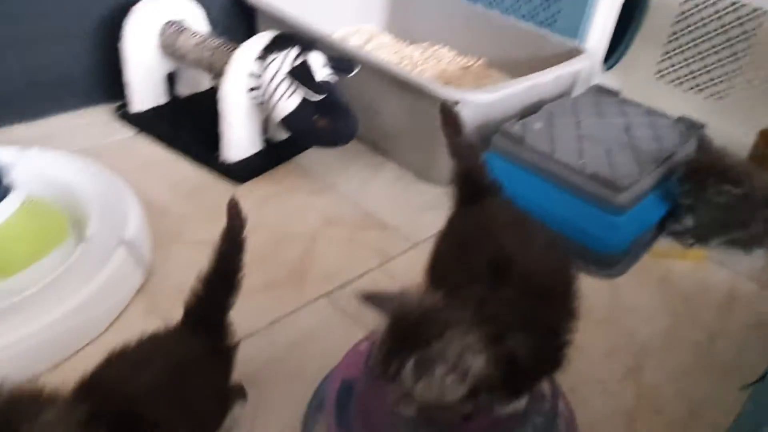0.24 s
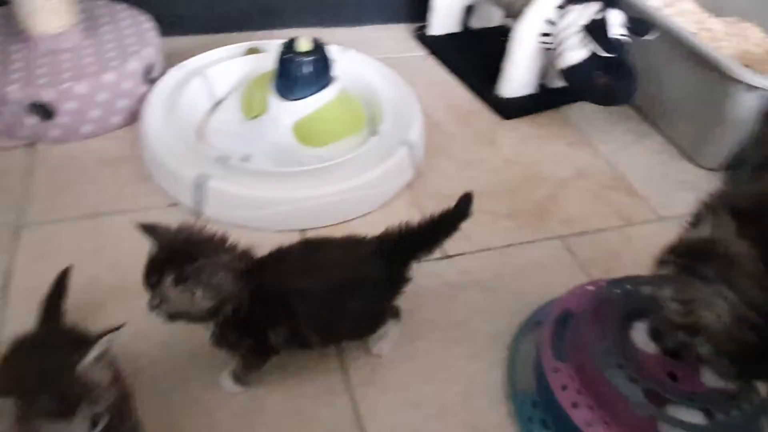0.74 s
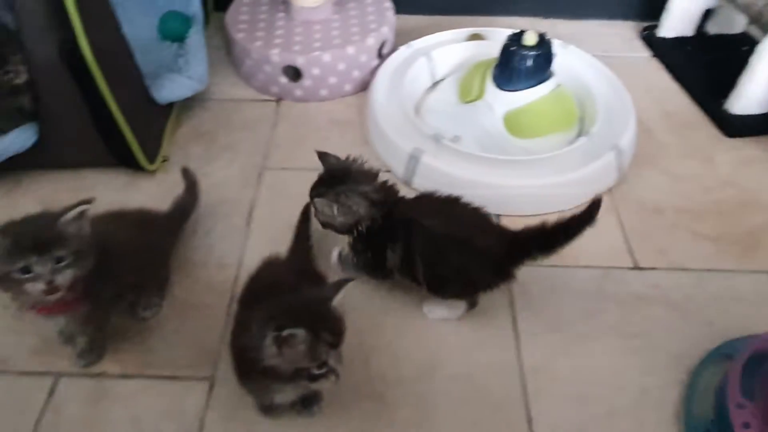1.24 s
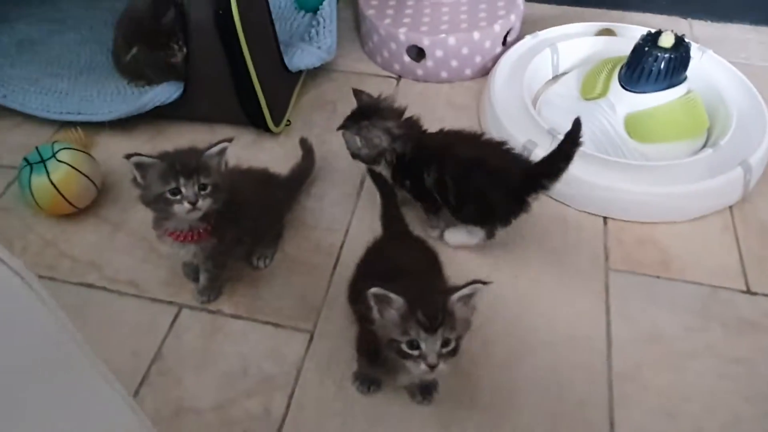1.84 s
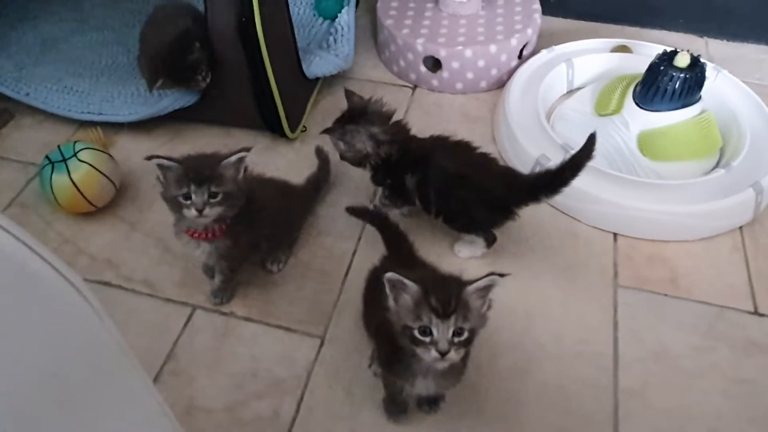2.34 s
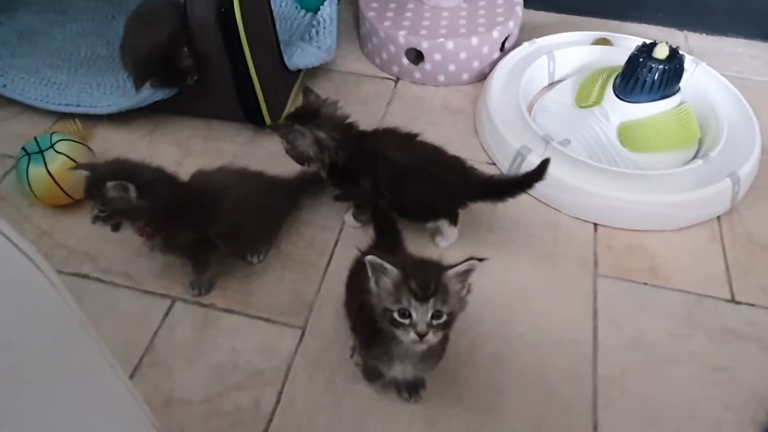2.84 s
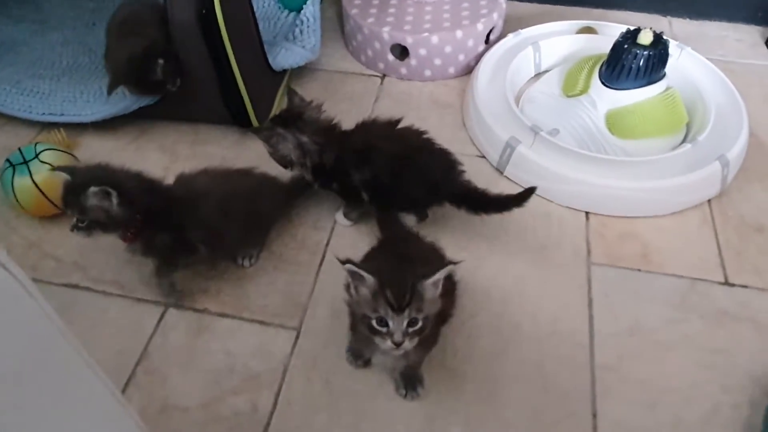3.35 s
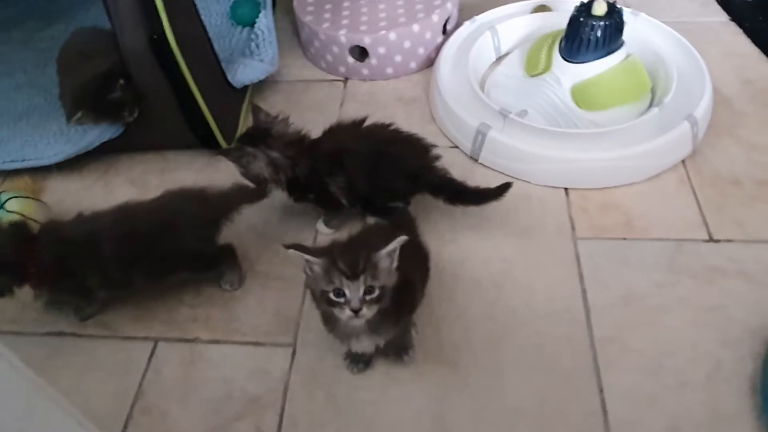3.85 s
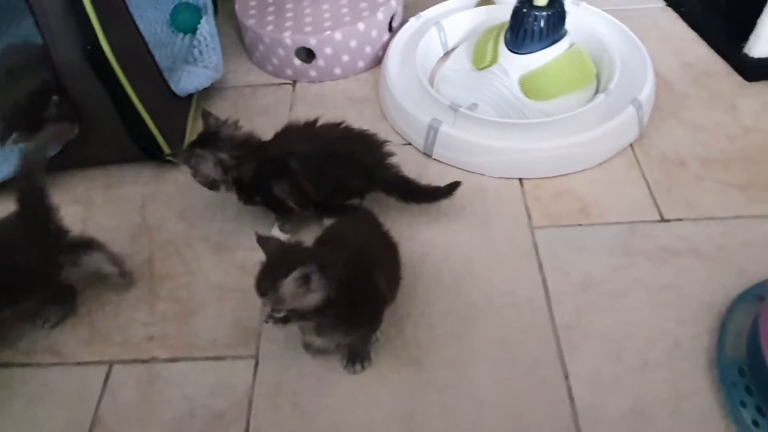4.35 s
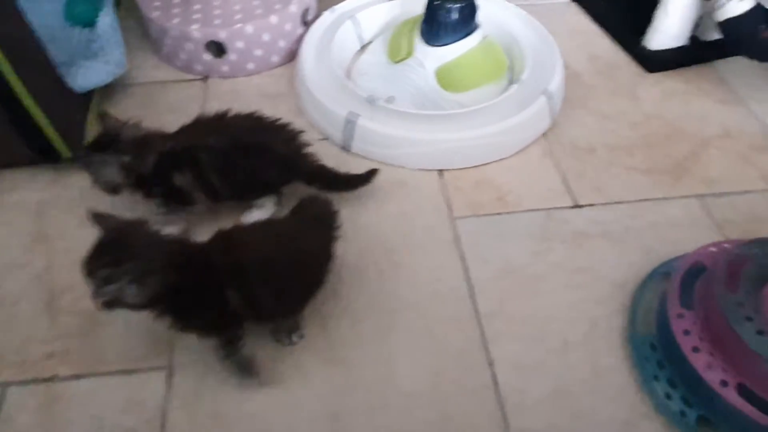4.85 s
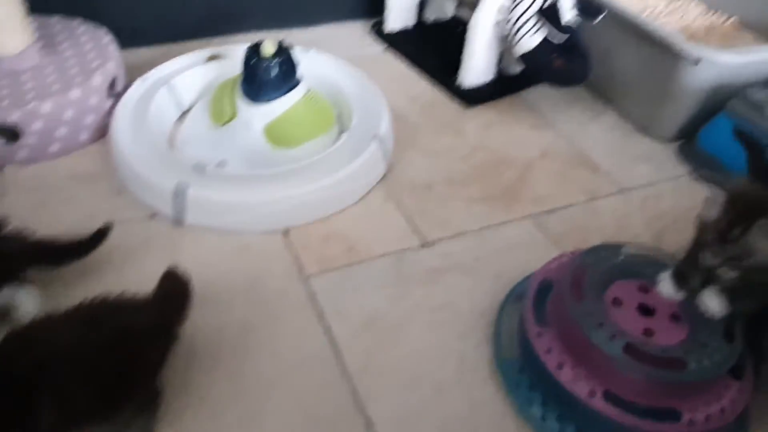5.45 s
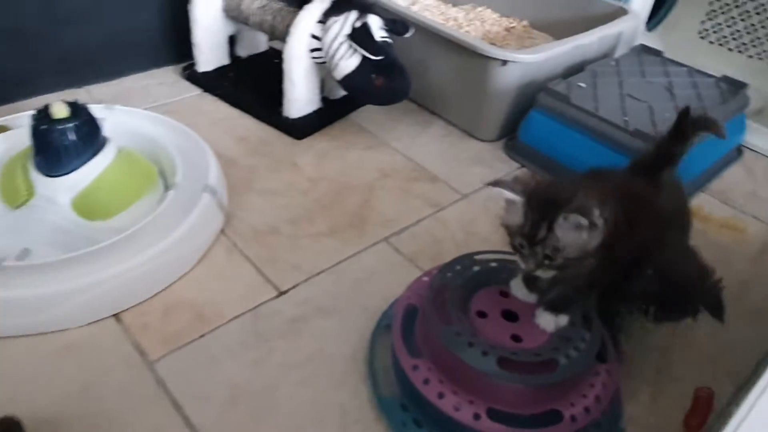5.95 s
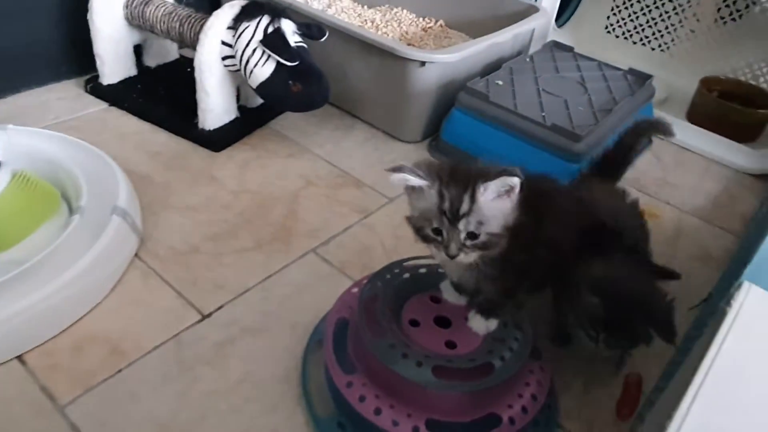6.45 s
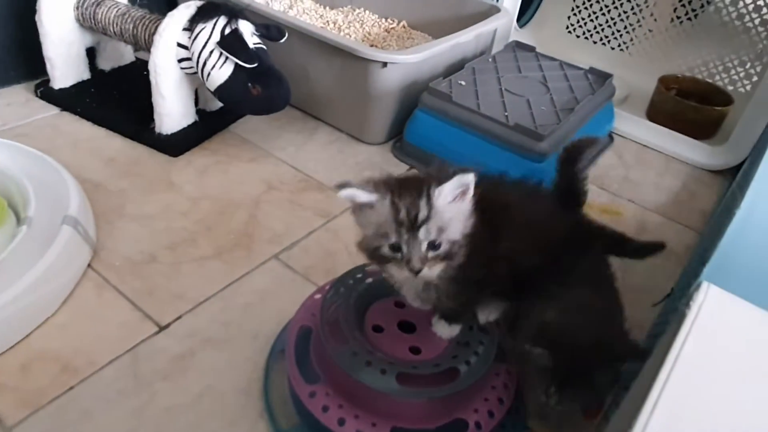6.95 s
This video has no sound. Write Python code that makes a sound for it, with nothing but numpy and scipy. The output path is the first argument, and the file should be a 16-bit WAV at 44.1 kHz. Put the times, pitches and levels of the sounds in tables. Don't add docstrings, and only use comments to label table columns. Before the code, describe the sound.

Kittens mill about on hard tiles near a handheld stereo microphone with low handling rumble and faint hum. A bright thin mew comes first, then near quiet, then a weaker mew running into a dense flurry of hollow plastic knocks, sharp ticks and paw scrabble. The ball hums on as it slows. A far-off mew overlaps a small chirp, and two small groups of knocks end it, with short room reverberation.

```python
import sys
import numpy as np
from scipy import signal
from scipy.fft import rfft, irfft, next_fast_len
from scipy.io import wavfile
from scipy.ndimage import uniform_filter1d, map_coordinates

SR = 44100
rng = np.random.default_rng(int(sys.argv[2]) if len(sys.argv) > 2 else 0)


def amplitude_ratio(level_db):
    exponent = np.asarray(level_db, float) / 20
    return 10 ** exponent


def transcribe(u):
    v = np.clip(np.atleast_2d(u).T, -1, 1)
    q = np.round(v * 32767).astype(np.int16)
    wavfile.write(sys.argv[1], SR, q)


N = 317512

# t/s, pitch/Hz, effort/dB, mouth opening/0-1
FIRST_MEW = [(.812, 1270, -51, .95), (.845, 1241, -36.5, 0.94), (.872, 1245, -34, 0.92),
             (.965, 1267, -36.5, 0.7), (1.03, 1234, -37.5, .55), (1.088, 1232, -36.5, 0.43),
             (1.118, 1195, -44.5, 0.56), (1.2, 1162, -43, 0.46), (1.3, 1126, -47, 0.44)]
FIRST_MEW_CLOSING = [
    (1.41, 1097, -46, .37),
    (1.45, 1170, -57, .25),
    (1.466, 980, -59, .03),
    (1.488, 860, -70, 0),
]
SECOND_MEW = [(2.952, 1179, -54.5, 1), (2.994, 1221, -44, 0.7), (3.04, 1202, -40.5, 0.8),
              (3.079, 1198, -40, 0.75), (3.139, 1163, -47.5, 0.71), (3.2, 1145, -48, 0.7),
              (3.26, 1128, -49, 0.58), (3.315, 1116, -45.5, 0.45), (3.342, 1150, -50, 0.45)]
DISTANT_MEW = [(4.617, 1041, -72, 0.67), (4.64, 990.3, -57, 0.85), (4.725, 1069, -54, 0.94),
               (4.76, 1166, -52.5, 0.77), (4.8, 1190, -53, 0.68), (4.9, 1224, -57, 0.61),
               (4.97, 1289, -61, 0.5), (5.03, 1283, -52.5, 0.44), (5.095, 1150, -70, 0.32)]
CHIRP = [(4.984, 1456, -60, 0.52), (5.001, 1447, -56, 0.52), (5.04, 1431, -52.5, 0.5),
         (5.064, 1400, -53, 0.42), (5.08, 1330, -54, 0.4), (5.095, 1190, -57, .4), (5.12, 1150, -75, 0.3)]
EARLY_CHIRP = [
    (3.345, 1170, -48, .38),
    (3.365, 1225, -43, .38),
    (3.39, 1232, -44, .38),
    (3.42, 1195, -50, .38),
    (3.46, 1150, -62, .38),
]
# f/Hz, level/dB
FIRST_MOUTH = [(2530, -47), (4300, -8), (5080, -7), (5660, -17.5), (6130, -7), (7900, -15), (8610, -17.5),
               (10200, -15.5), (12400, -7), (15600, -23.5)]
SECOND_MOUTH = [(2470, -62), (4200, -26), (4820, -8), (5200, -18), (5680, -4), (6100, -4), (7670, -23.5),
                (8470, -12), (8950, -16.5), (15600, -24)]
DISTANT_MOUTH = [(3900, -3), (4600, 6.5), (5300, -2), (6100, 6.5), (7200, -6), (8000, -16), (9500, -18),
                 (11500, -4), (13000, -8), (15000, -28)]
CHIRP_MOUTH = [(4000, -20), (5700, 0), (7200, -18), (9500, -20), (11500, -8), (13000, -18), (15600, -30)]
# left lag/ms, left-right low/dB, left-right high/dB
SEATS = [
    (0.3367, -0.5, 1.5),
    (-.25, -8.5, 3),
    (-.2, -4.5, -3),
    (-0.272, -0.5, -0.5),
    (-0.26, -5.5, -4),
]
# room/dB, breath/dB, pitch jitter/share, rasp/share
VOICES = [
    (-9, -30.5, .0024, .002),
    (-10, -30, .0024, .0015),
    (-2, -25, .007, .004),
    (-4, -26, .004, .002),
    (-8, -22, .016, .01),
]
# fundamental shut/dB, open/dB, least 2nd partial/dB, upper partials shut/dB, open/dB
BUILDS = [
    (0, -27, -17.5, -6.5, -10.5),
    (-14, -27, -5, -11, -7),
    (-25, -17.5, -5.5, -24, -1.5),
    (-14, -24, -10.5, -10, -8),
    (-35, -36, -1.5, -30, -30),
]
# f/Hz, density/dB per Hz
BREATH = [(500, -30), (1100, -13), (1900, -22), (3000, -13), (4500, -12), (6500, -1), (8000, -12),
          (10000, -5), (12500, 0), (15500, -20)]
HEAD_SHADE_HZ = 3000


def mews(out):
    contours = (FIRST_MEW + FIRST_MEW_CLOSING, SECOND_MEW, DISTANT_MEW, CHIRP, EARLY_CHIRP)
    mouths = (FIRST_MOUTH, SECOND_MOUTH, DISTANT_MOUTH, CHIRP_MOUTH, CHIRP_MOUTH)
    for contour, mouth, seat, manner, build in zip(contours, mouths, SEATS, VOICES, BUILDS):
        lag_ms, pan_db, high_pan_db = seat
        room_db, breath_db, jitter, rasp = manner
        s, *columns = np.transpose(contour)
        t = np.arange(s[0], s[-1], 1 / SR)
        pitch, effort_db, opening = [np.interp(t, s, column) for column in columns]
        unsteady = 1 + jitter * wobble(44.96, size=len(t)) + rasp * wobble(240, size=len(t))
        pitch = uniform_filter1d(pitch, size=300) * unsteady

        k = np.arange(1, 15)[:, None]
        gain = partial_gains(k, t - s[0], pitch, effort_db, opening, mouth, build)
        cycles = np.cumsum(pitch) / SR
        voice = np.sum(gain * np.sin(2 * np.pi * (k * cycles + rng.random(k.shape))), axis=0)
        air = unit(filtered(rng.standard_normal(len(t)), lambda hz: amplitude_ratio(along(BREATH, hz))))
        loudness = uniform_filter1d(np.linalg.norm(gain, axis=0), 2000)
        voice += amplitude_ratio(breath_db) * loudness * air
        voice *= np.clip(np.minimum(t - s[0], (s[-1] - t) / 4) / 0.0009, 0, 1)

        def to_ports(hz):
            shade_db = np.where(hz < HEAD_SHADE_HZ, pan_db, high_pan_db)
            return lagging(hz, lag_ms) * amplitude_ratio(np.outer([.5, -.5], shade_db))

        add(out, filtered(voice, to_ports), s[0], room_db)


SHUT_HZ, OPEN_HZ, MOUTH_WIDTH_HZ = 1000, 4200, 660
ONSET_FIRST_DB, ONSET_S = 16.5, .04
FLICKER_DB, STEADY_DB = 2.5, 10
FOURTH_DB = -8.5


def partial_gains(k, age_s, pitch, effort_db, opening, mouth, build):
    shut_db, open_db, second_db, dull_db, bright_db = build
    size = len(age_s)
    centre_hz = SHUT_HZ + (OPEN_HZ - SHUT_HZ) * opening
    low = 1 / (1 + ((k[:4] * pitch - centre_hz) / MOUTH_WIDTH_HZ) ** 2)
    low = low / np.linalg.norm(low, axis=0)
    first_db = shut_db + (open_db - shut_db) * opening + ONSET_FIRST_DB * np.exp(-age_s / ONSET_S)
    low[:2] = np.hypot(low[:2], amplitude_ratio([first_db, second_db + 0 * age_s]))
    slack = np.clip((effort_db.max() - effort_db) / STEADY_DB, .15, 1)
    flicker = np.array([wobble(38, size=size) for _ in low]) ** 2
    low *= amplitude_ratio(-FLICKER_DB * slack * flicker)

    upper = amplitude_ratio(along(mouth, k[3:] * pitch) + [2.6 * wobble(28, size=size) for _ in k[3:]])
    upper *= amplitude_ratio(dull_db + (bright_db - dull_db) * opening) / np.linalg.norm(upper, axis=0)
    upper[0] = np.hypot(upper[0], amplitude_ratio(FOURTH_DB) * low[3])

    gain = np.sqrt(2) * amplitude_ratio(effort_db) * np.vstack([low[:3], upper]) * (k * pitch < 15600)
    shimmer = np.array([wobble(120, size=size) for _ in k])
    return gain * (1 + (0.11 + 0.012 * k) * shimmer)


# t/s, peak/dB, bright rattle/dB, rise/ms
KNOCKS = [(2.999, -55, -5.5, 2.7), (3.105, -47.5, -13, 6.3), (3.125, -50, -18, 6), (3.15, -44, -18.5, 5.8),
          (3.168, -46, -18, 6), (3.19, -48, -18, 6), (3.213, -48, -18, 6), (3.23, -50, -18, 6),
          (3.248, -45.5, -8, 3.7), (3.268, -42.5, -18, 6.2), (3.284, -27, -10.5, 3.2), (3.339, -41, -11, 5),
          (3.349, -30, -8, 4), (3.359, -34, -14, 4.2), (3.366, -25, -13, 4), (3.409, -38.5, -20, 5.2),
          (3.433, -35.5, -25, 5.5), (3.472, -36, -21, 2), (3.516, -37, -8, 1.14), (3.532, -40, -15, 2),
          (3.576, -25, -14, 0.98), (3.589, -36, -9.5, 2.1), (3.619, -30.5, -14, 1.2),
          (3.633, -44, -14.5, 1.7), (3.648, -40, -16, 2.2), (3.655, -39.5, -12, 2.1),
          (3.671, -36.5, -9.5, 3.8), (3.688, -43.5, -8, 2), (3.756, -44.5, -23, 1.5), (3.862, -47, -15, 3),
          (3.876, -46, -16, 3.3), (3.894, -22.5, -15, 6), (3.914, -32, -7, 4.8), (3.958, -39.5, -14, 4),
          (3.973, -42, -11, 3.1), (4.01, -45, -18, 5.3), (4.139, -43.5, -16.5, 6), (4.29, -58.5, -21, 5.9),
          (5.636, -36, -13.5, 1.66), (5.645, -34.5, -14.5, 3.7), (5.677, -37.5, -11, 1.34),
          (6.319, -37.5, -15.5, 2.9), (6.374, -30.5, -11.5, 2.2), (6.385, -32.5, -17, 1.5),
          (6.413, -31.5, -9, 1.2), (6.421, -37, -25, 2.1)]
# t/s, hollow ring/dB, floor thud over it/dB
PAWS = [(1.244, -61.5, -8), (1.567, -64.5, 14.5), (1.653, -74.5, 19.5), (2.703, -68.5, 11.5),
        (4.479, -58, -20), (4.492, -56, -20), (5.481, -58, -5), (5.794, -54, -12), (5.88, -57, -12),
        (6.542, -60, -17), (6.705, -63.5, -7.5)]
# f/Hz, level/dB, t60/s
HOLLOW = [(505, -4, .045), (562, 1, .06), (615, -4, .04), (700, -14, .035), (790, -17, .035),
          (900, -22, .025)]
KNOCK_THUD_DB = -20.5
PAW_BRIGHT_DB, PAW_RISE_MS = -17, 3.2
SCATTER_DB, DETUNE_SHARE = 2.5, .02
CRACK_T60_S, RATTLE_T60_S, RATTLE_GRAIN_DB, THUD_T60_S = 0.0068, 0.21, 3.5, 0.023
OUTER_RING_S, OUTER_RING_HZ, OUTER_RING_DB = 3.5, 650, 5
CAMERA_SWING_S, LAG_BEFORE_MS, LAG_AFTER_MS = 5, .14, -.12
TRACK_ROOM_DB = -10


def knocks(out):
    t = np.arange(SR // 8) / SR
    blows = [(*row, KNOCK_THUD_DB) for row in KNOCKS]
    blows += [(s, db, PAW_BRIGHT_DB, PAW_RISE_MS, thud_db) for s, db, thud_db in PAWS]
    for s, db, bright_db, rise_ms, thud_db in blows:
        ring = np.zeros(len(t))
        for hz, level_db, t60_s in HOLLOW:
            outer_db = OUTER_RING_DB * (s > OUTER_RING_S and hz > OUTER_RING_HZ)
            mode_db = level_db + outer_db + rng.normal(0, SCATTER_DB)
            mode_hz = hz * rng.normal(1, DETUNE_SHARE)
            ring += amplitude_ratio(mode_db - 60 * t / t60_s) * np.sin(2 * np.pi * mode_hz * t)
        ring *= np.sin(np.pi / 2 * np.clip(1000 * t / rise_ms, 0, 1)) ** 2

        grain_db = RATTLE_GRAIN_DB * wobble(167, size=len(t))
        rattle = amplitude_ratio(-60 * t / RATTLE_T60_S + grain_db) + amplitude_ratio(-60 * t / CRACK_T60_S)
        rattle = filtered(rattle * rng.standard_normal((2, len(t))), shell)
        thud = amplitude_ratio(-60 * t / THUD_T60_S) * np.sin(2 * np.pi * rng.uniform(210, 215) * t)

        blow = ring / abs(ring).max() + amplitude_ratio(bright_db) * rattle / abs(rattle).max() + amplitude_ratio(thud_db) * thud
        lag_ms = LAG_AFTER_MS if s > CAMERA_SWING_S else LAG_BEFORE_MS
        blow = filtered(blow, lambda hz: lagging(hz, lag_ms))
        add(out, amplitude_ratio(db) * blow, s, TRACK_ROOM_DB)


# f/Hz, width/Hz, level/dB
SHELL = [(1270, 540, -3), (1860, 127, 1), (2002, 250, 1.5), (2500, 776, -3), (4200, 670, -15.5),
         (6500, 1400, -59)]


def shell(f):
    return sum((-1) ** k * amplitude_ratio(db) * bandpass(f, hz, width_hz) for k, (hz, width_hz, db) in enumerate(SHELL))


# t/s, peak/dB, f/Hz, t60/s
LIP_SMACKS = [(.7407, -55, 12340, 0.06), (0.74, -50, 4530, 0.013), (0.813, -43, 4200, .022),
              (2.8765, -66, 12600, 0.024), (2.8827, -55.5, 1910, 0.02), (2.95, -49, 4450, 0.032),
              (5.0618, -54, 12000, 0.028), (5.063, -52, 4130, 0.026)]
CLAW_TICKS = [(0.3822, -61, 2900, 0.034), (.394, -57.5, 5200, 0.027), (0.6079, -64.5, 10900, 0.011),
              (2.2952, -64, 4900, 0.0094), (2.7044, -74.5, 3560, 0.018), (4.161, -53, 7500, 0.016),
              (4.2453, -62.5, 6100, 0.033), (4.4789, -64.5, 2060, .11), (4.4794, -72.5, 5880, 0.073),
              (5.27, -74, 12600, 0.017), (6.098, -75, 8400, 0.021)]
BALL_TICKS = [(3.343, -37.5, 5660, 0.032), (3.35, -37.5, 2580, 0.03), (3.5307, -30, 2580, 0.021),
              (3.53, -43, 6500, 0.043), (3.66, -40, 7330, 0.03), (3.661, -41, 2500, 0.032),
              (3.718, -53, 6500, .025), (3.778, -59, 6500, 0.04), (3.9138, -54.5, 8000, 0.022),
              (5.686, -57.5, 3870, 0.053)]
# left-right/dB, room/dB
TICK_PLACES = [
    (-8.5, -3.5),
    (-11.5, 0.5),
    (-6.5, -2),
]
WIDEST = 1.6


def ticks(out):
    t = np.arange(SR // 10) / SR
    kinds = zip((LIP_SMACKS, CLAW_TICKS, BALL_TICKS), TICK_PLACES)
    contacts = [(*row, *place) for rows, place in kinds for row in rows]
    for s, db, centre_hz, t60_s, pan_db, room_db in contacts:
        noise = rng.standard_normal(len(t)) + 0.92 * rng.standard_normal((2, len(t)))
        burst = amplitude_ratio(-60 * t / t60_s) * noise
        width_hz = centre_hz * min((.02 / t60_s) ** 0.94, WIDEST)
        burst = filtered(burst, lambda f: bandpass(f, centre_hz, width_hz) ** 2)
        port_db = db + np.array([[pan_db / 2], [-pan_db / 2]])
        add(out, amplitude_ratio(port_db) * burst / abs(burst).max(), s, room_db)


FINGER_S, FINGER_DB, FINGER_HZ, FINGER_WIDTH_HZ, FINGER_PAN_DB = 5.9268, -35, 1200, 1500, -24


def finger(out):
    pulse = np.pad(np.hanning(M=11), (0, 400))
    tap = filtered(pulse, lambda f: bandpass(f, FINGER_HZ, FINGER_WIDTH_HZ))
    port_db = FINGER_DB + np.array([[FINGER_PAN_DB], [0]])
    add(out, amplitude_ratio(port_db) * tap / tap.max(), FINGER_S, -20)


ROLL_DB, ROLL_T60_S, ROLL_REST_DB = -28.5, 0.84, -89
EARLIER_ROLL = [(0, -64.5 - ROLL_DB)]


def roll():
    power = amplitude_ratio(2 * ROLL_DB) * lingering(KNOCKS + EARLIER_ROLL, ROLL_T60_S, 0.0051)
    rolling = np.sqrt(power + amplitude_ratio(2 * ROLL_REST_DB))
    # f/Hz, density/dB per Hz
    hum_of_hollow = [(250, -40.5), (430, -14), (500, 1), (560, -2), (630, -11), (850, -16), (1100, -26), (1500, -50)]
    return rolling * amplitude_ratio(2.3 * wobble(32)) * rush(hum_of_hollow)


# f/Hz, density/dB per Hz
MURMUR = [(65, -22), (110, -11), (172, -11.5), (388, -14.5), (450, -24.5), (580, -76), (990, -120)]
# t/s, peak/dB
SHUFFLES = [
    (.5, -74),
    (1.3, -64.5),
    (4.65, -71),
    (5.39, -67.5),
    (6.75, -70.5),
]
SHUFFLE_RISE_S, SHUFFLE_T60_S = 0.25, 0.75
BOOM_DB, BOOM_T60_S = -30.5, 0.67
MURMUR_DB, MURMUR_FOLLOWS = -76, .6


def murmur():
    stir_db = milling_db()
    steady_db = MURMUR_DB + MURMUR_FOLLOWS * (stir_db - stir_db.mean())
    power = amplitude_ratio(2 * BOOM_DB) * lingering(KNOCKS + EARLIER_ROLL, BOOM_T60_S, 0.0032)
    power += amplitude_ratio(2 * steady_db) + lingering(SHUFFLES, SHUFFLE_T60_S, SHUFFLE_RISE_S)
    return np.sqrt(power) * amplitude_ratio(0.6 * wobble(9.7)) * rush(MURMUR)


# f/Hz, density/dB per Hz
FUR = [(900, 1.5), (2200, 2), (4000, -1), (6500, 0.5), (8000, -14.5), (12000, -6.5), (15500, -28)]
# t/s, peak/dB
SCRABBLES = [
    (3.35, -47),
    (3.62, -60.5),
    (3.95, -63),
    (4.25, -76.5),
    (5.72, -96),
    (6.43, -91),
]
SCRABBLE_RISE_S, SCRABBLE_T60_S = 0.025, 0.65


def fur():
    stirring = np.sqrt(lingering(SCRABBLES, SCRABBLE_T60_S, SCRABBLE_RISE_S) + amplitude_ratio(2 * milling_db()))
    return stirring * amplitude_ratio(2.3 * wobble(32)) * rush(FUR)


# t/s, rustle/dB
MILLING = [(0, -77.5), (.5, -82.5), (.78, -72), (1, -76), (1.4, -68), (1.55, -77.5), (1.9, -88),
           (2.85, -86), (4.55, -82), (5, -82.5), (5.5, -85), (7.2, -89.5)]


def milling_db():
    return np.interp(np.arange(N) / SR, *np.transpose(MILLING))


# t/s, rumble/dB
GRIP = [(0.0, -74), (0.1, -61.5), (0.3, -70), (0.76, -61), (0.84, -54.5), (1.1, -65), (1.22, -53),
        (1.3, -66), (2.59, -79.5), (2.77, -62), (2.87, -78.5), (3.41, -64), (3.89, -78), (3.99, -60),
        (4.23, -81.5), (4.79, -62), (7.16, -70), (7.2, -77)]
# f/Hz, density/dB per Hz
RUMBLE = [(13, -32.5), (28, -14), (54, 4), (75, 7.5), (108, 0.5), (130, -23.5), (170, -45), (290, -120)]
GRIP_DB = 1.5


def hand_rumble():
    level_db = GRIP_DB + np.interp(np.arange(N) / SR, *np.transpose(GRIP))
    shake = amplitude_ratio(-2.5) * rush(RUMBLE)
    shake = shake + [[0], [amplitude_ratio(-2)]] * rush(RUMBLE)
    return amplitude_ratio(level_db + 2.3 * wobble(26)) * shake


# f/Hz, rms/dB
HUM = [(50, -79), (100, -72.5), (250, -86), (335, -93)]
HUM_SWAY_DB = 3


def mains_hum():
    t = np.arange(N) / SR
    hum = np.zeros(N)
    for hz, db in HUM:
        level = np.sqrt(2) * amplitude_ratio(db + HUM_SWAY_DB * wobble(4.2))
        hum += level * np.sin(2 * np.pi * hz * t + 1.1 * wobble(12))
    return hum


# f/Hz, density/dB per Hz
HISS = [(220, -38), (380, -27), (552, -8), (921, -14.5), (1080, -14.5), (1770, -17), (2030, -19.5),
        (2650, -17.5), (7500, -28.5), (15600, -25.5)]
HISS_DB = -82


def hiss():
    return amplitude_ratio(HISS_DB) * rush(HISS)


def lingering(events, t60_s, rise_s):
    t = np.arange(0, N / SR, .0005)
    power = np.zeros(len(t))
    for s, db, *_ in events:
        age = np.clip(t - s, 0, None)
        swell = np.clip(1 + (t - s) / rise_s, 0, 1) ** 4
        power += amplitude_ratio(2 * (db - 60 * age / t60_s)) * swell
    return np.interp(np.arange(N) / SR, t, power)


def unit(x):
    return x / np.sqrt(np.mean(x ** 2) + 1e-20)


def along(points, hz):
    f, v = np.transpose(points)
    return np.interp(np.log(hz + 1), np.log(f + 1), v)


def wobble(rate_hz, size=N):
    knots = rng.standard_normal(int(size * rate_hz / SR) + 4)
    return map_coordinates(knots, [np.arange(size) * rate_hz / SR])


def filtered(x, response):
    m = next_fast_len(x.shape[-1] + 8192)
    return irfft(rfft(x, m) * response(np.fft.rfftfreq(m, 1 / SR)), m)[..., :x.shape[-1]]


def bandpass(f, centre_hz, width_hz):
    damping = 1j * f * width_hz
    return damping / (centre_hz ** 2 - f * f + damping)


def lagging(hz, lag_ms):
    return np.exp(np.outer([-1, 1], 1j * np.pi * hz * lag_ms / 1000))


# f/Hz, left-right likeness/0-1
ALIKE = [(60, 0.9), (240, 0.78), (950, 0.58), (3770, 0.091), (15000, 0.091)]


def spread(pair, gain):
    def mid_side(hz):
        turn = np.arccos(np.clip(along(ALIKE, hz), -1, 1)) / 2
        return gain(hz) * [np.cos(turn), np.sin(turn)]

    mid, side = filtered(pair, mid_side)
    return np.array([mid + side, mid - side])


def rush(spectrum):
    return unit(spread(rng.standard_normal((2, N)), lambda hz: amplitude_ratio(along(spectrum, hz))))


# f/Hz, t60/s
ROOM = [(300, 0.17), (800, 0.53), (2200, 0.46), (5500, 0.44), (12000, 0.18)]


def add(out, sound, s, room_db):
    hz, t, z = signal.stft(rng.standard_normal((2, SR * 2 // 5)), SR, nperseg=256)
    decay = amplitude_ratio(-60 * t / along(ROOM, hz)[:, None])
    tail = signal.istft(z * decay, SR, nperseg=256)[1]
    tail = spread(tail, np.ones_like)
    wet = signal.fftconvolve(sound, tail / np.linalg.norm(tail[0]), axes=1)
    start = round(s * SR)
    echo = start + round(.006 * SR)
    out[:, start:start + sound.shape[1]] += sound
    out[:, echo:echo + wet.shape[1]] += amplitude_ratio(room_db) * wet


# f/Hz, level/dB
PORT = [(9000, 0.5), (13500, 1.5), (14800, -5), (15700, -11)]
RIGHT_DB = 3


def scene():
    out = np.zeros((2, N + SR))
    for source in (mews, knocks, ticks, finger):
        source(out)
    near = filtered(out[:, :N], lambda hz: amplitude_ratio(along(PORT, hz)))
    background = roll() + murmur() + fur() + hand_rumble() + mains_hum() + hiss()
    return near + background * amplitude_ratio([[-RIGHT_DB / 2], [RIGHT_DB / 2]])


def low_pass(x):
    return signal.sosfilt(signal.butter(12, 15710, fs=SR, output="sos"), x)


def record(dry):
    mix = filtered(dry, lambda hz: hz < 15700)
    return low_pass(mix)


dry = scene()
out = record(dry)
transcribe(out)
```